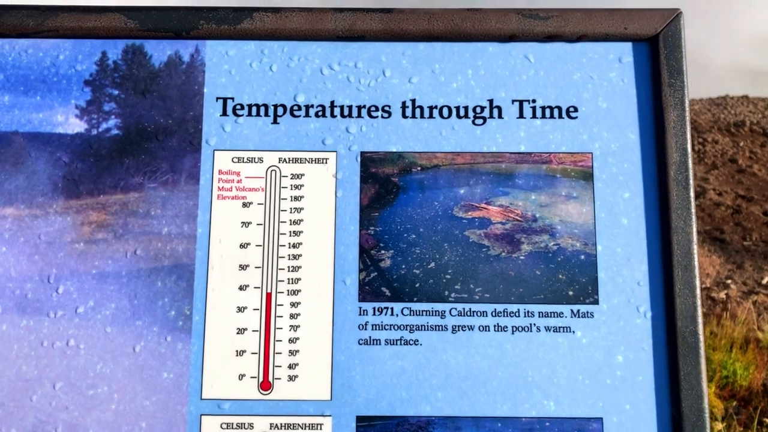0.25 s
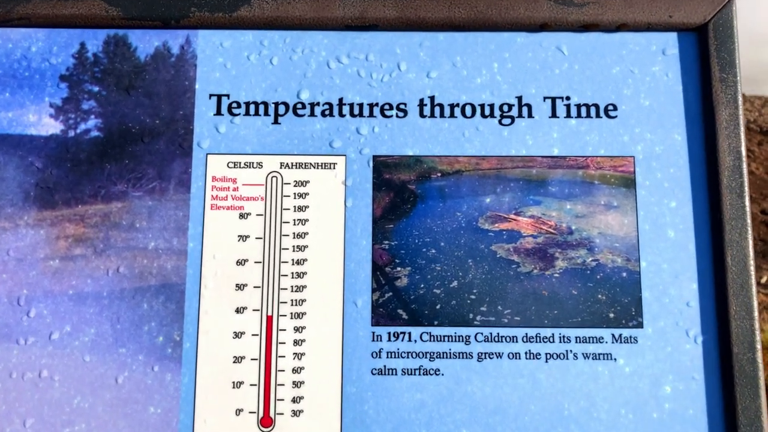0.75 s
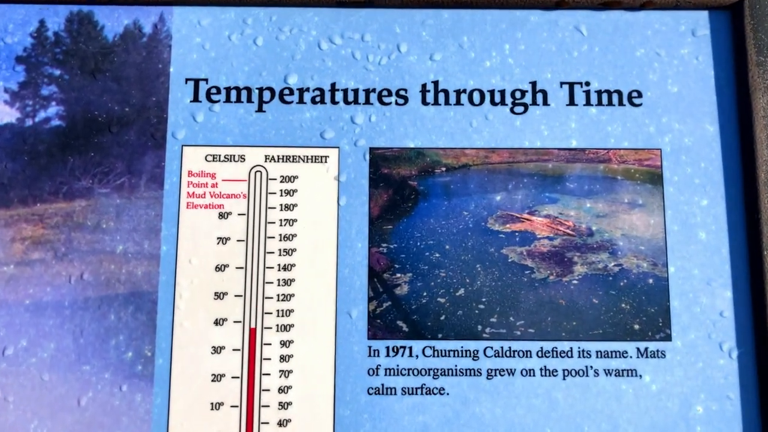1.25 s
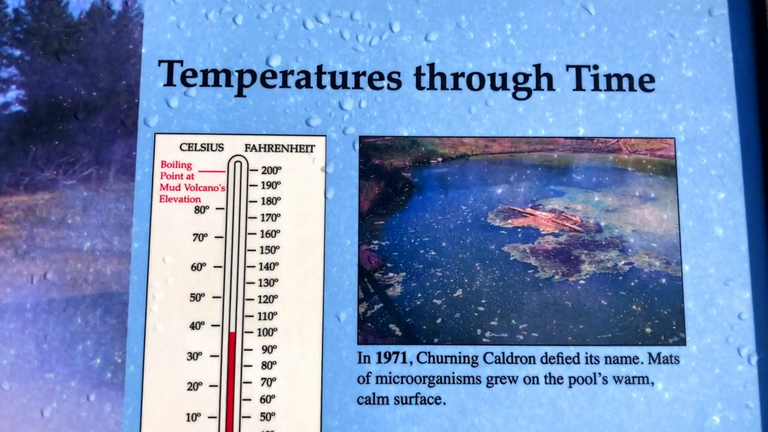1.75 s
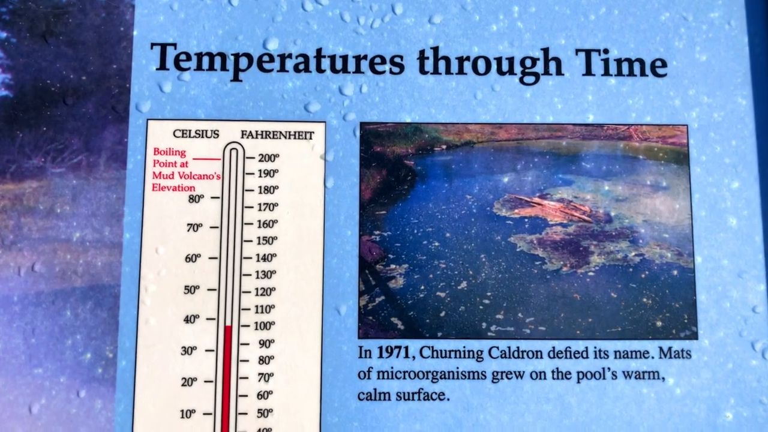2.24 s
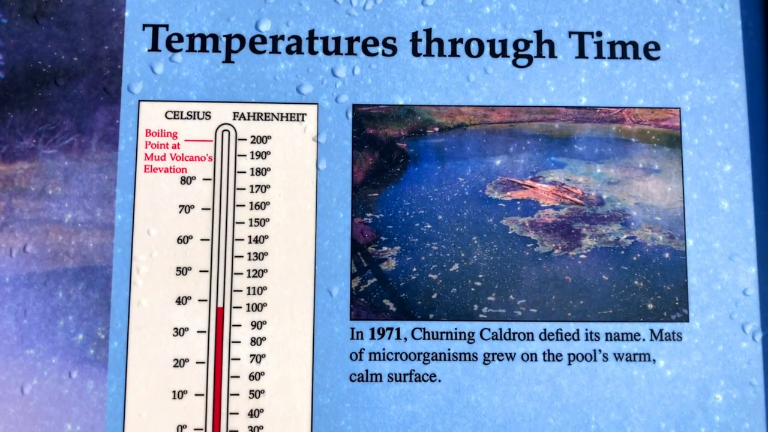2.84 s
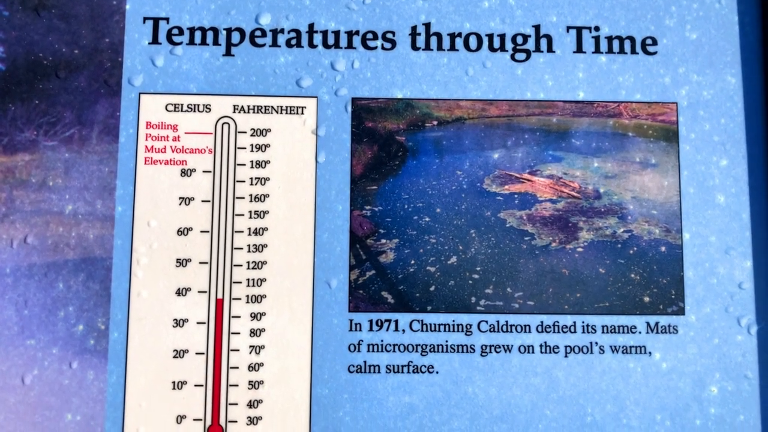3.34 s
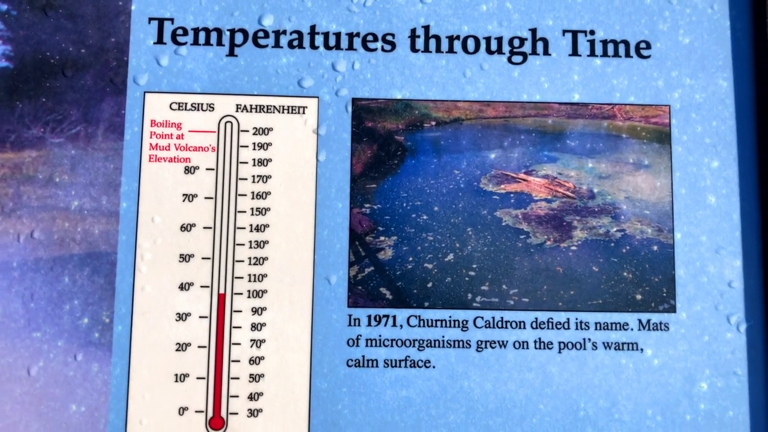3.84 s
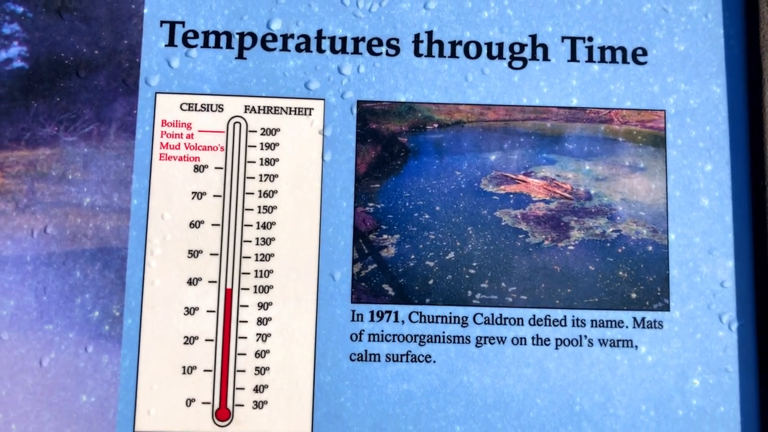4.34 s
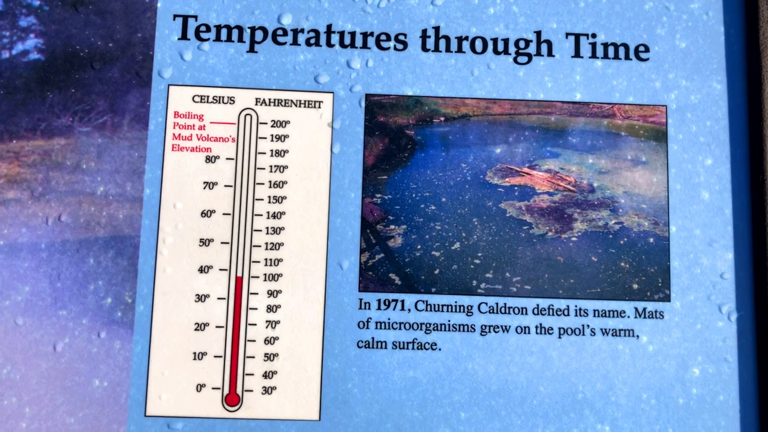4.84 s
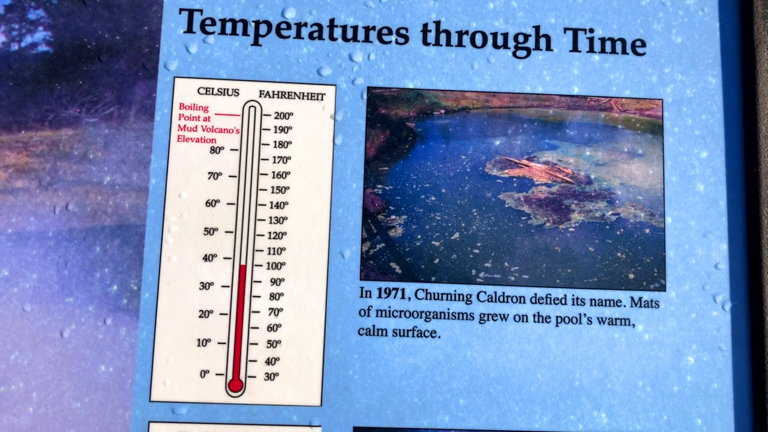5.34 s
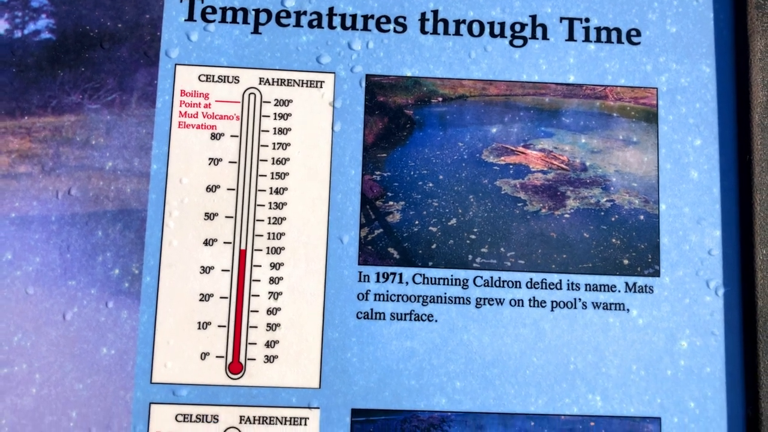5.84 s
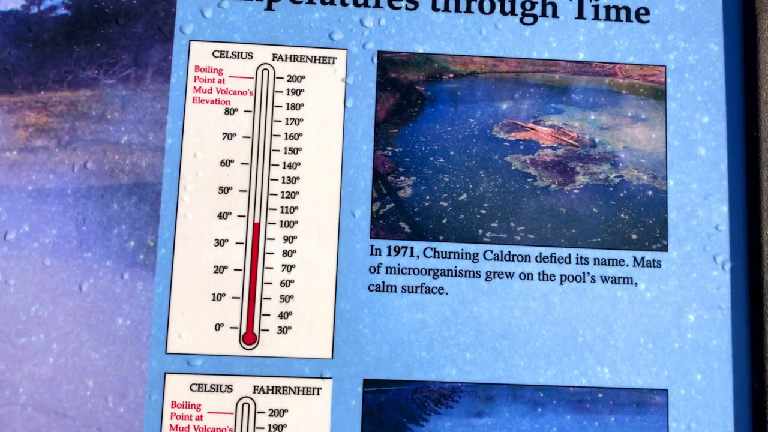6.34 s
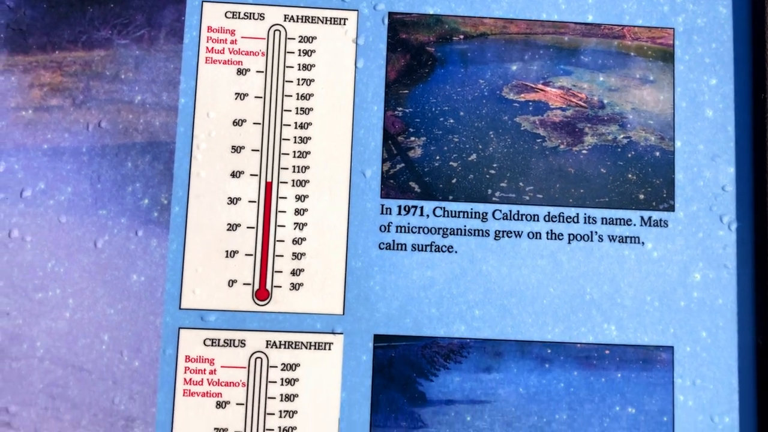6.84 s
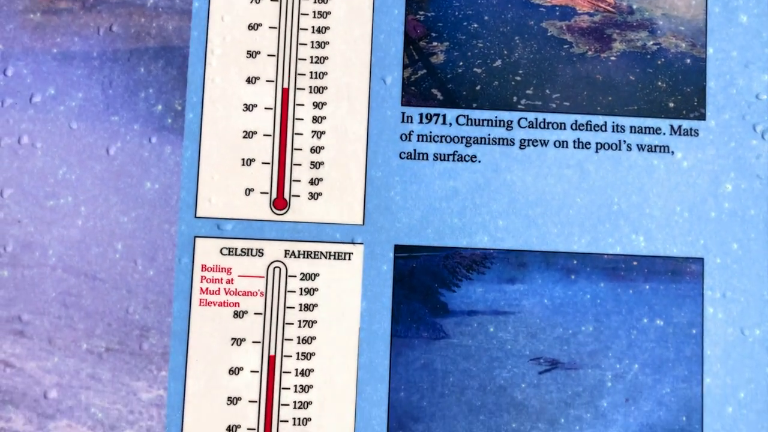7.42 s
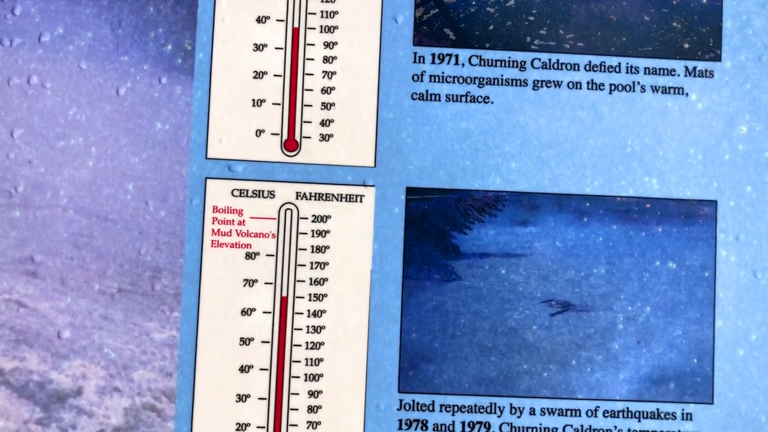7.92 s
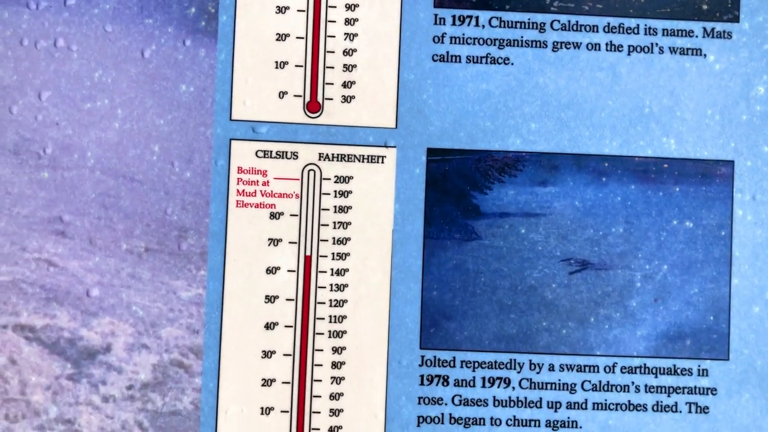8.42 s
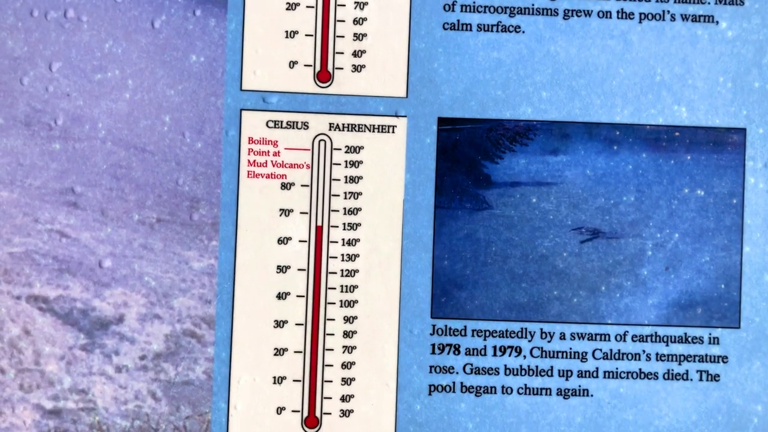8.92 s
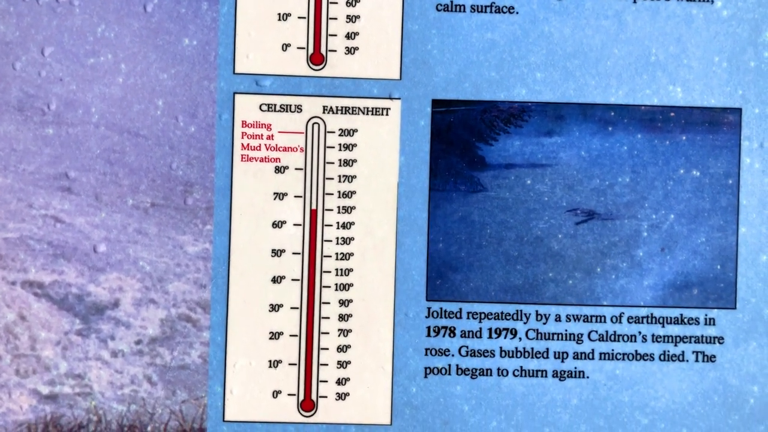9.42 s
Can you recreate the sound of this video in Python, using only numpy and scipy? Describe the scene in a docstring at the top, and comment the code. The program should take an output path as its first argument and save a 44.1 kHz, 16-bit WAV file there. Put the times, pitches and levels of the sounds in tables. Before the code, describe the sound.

Turbulent hot water gurgles, slaps and hisses continuously, swelling around the middle with heavy bubble thumps before a final sharp burst of steam.

```python
"""Churning, splashing water is heard first: a boiling hot spring from a few metres, bubbles thumping as they burst.
A hollow roar stands over it, spray hisses in gusts, and a rush of steam builds at the end.
Water, roar, spray and steam are coloured patchy noise, most with swarms of bubbles; big bubbles are gliding
damped sines. A two-port microphone takes it; its treble is one signal, shifted between the channels.
"""
import sys
import numpy as np
from scipy import signal
from scipy.fft import rfft, irfft, next_fast_len
from scipy.io import wavfile
from scipy.ndimage import uniform_filter1d, map_coordinates

SR = 44100
rng = np.random.default_rng(int(sys.argv[2]) if len(sys.argv) > 2 else 0)


def generate_wav(signal):
    """Clip the signal to [-1, 1] and save it as 16-bit WAV at the path in sys.argv[1]."""
    frames = np.transpose(np.atleast_2d(signal))
    scaled = np.clip(frames, -1, 1) * 32767
    pcm = np.round(scaled).astype(np.int16)
    wavfile.write(sys.argv[1], SR, pcm)


def how_loud(loudness_db):
    """Turn decibels into a plain amplitude multiplier (0 dB gives 1, 20 dB gives 10)."""
    steps = np.asarray(loudness_db, float) / 20
    return 10 ** steps


N = 426447  # samples


def unit(x):
    """Scales to rms 1."""
    return x / np.sqrt(np.mean(x ** 2) + 1e-20)


def along(points, hz):
    """Interpolates (frequency [Hz], value) points on a log frequency axis."""
    f, v = np.transpose(points)
    return np.interp(np.log(hz + 1), np.log(f + 1), v)


def curves(rows):
    """One value per sample for each column after the time."""
    s, *cols = np.transpose(rows)
    return [np.interp(np.arange(N) / SR, s, c) for c in cols]


def wobble(rate_hz):
    """Smooth random curve with rate_hz knots a second."""
    knots = rng.standard_normal(int(N * rate_hz / SR) + 4)
    return map_coordinates(knots, [np.arange(N) * rate_hz / SR])


def filtered(x, response):
    """Applies a complex response of frequency [Hz]."""
    m = next_fast_len(N + 8192)
    return irfft(rfft(x, m) * response(np.fft.rfftfreq(m, 1 / SR)), m)[..., :N]


def patchy(patch_db, streak_db=0.0):
    """Two noises sharing short patches of random gain and long narrow streaks."""
    z = signal.stft(rng.standard_normal((2, N)), nperseg=512)[2]
    chance = rng.standard_normal((2, *z.shape[1:]))
    # axis 0: frequency, axis 1: time
    patches = uniform_filter1d(uniform_filter1d(chance[0], size=5, axis=0), size=10, axis=1)
    streaks = uniform_filter1d(uniform_filter1d(chance[1], size=60, axis=1), size=30, axis=1)
    gain = how_loud(patch_db * unit(patches) + streak_db * np.tanh(unit(streaks)))
    return signal.istft(z * gain, nperseg=512)[1][:, :N]


# left-right likeness: (frequency [Hz], likeness [0-1])
LIKENESS = [(60, 0.98), (300, 1), (550, 0.78), (800, 0.73), (1300, 0.2), (2000, 0.06), (3000, 0), (5500, 0)]


def at_ports(pair, colour, lead_s, least_alike=0):
    """Colours a direct and a scattered signal and spreads them on two ports, rms 1; the left hears first."""
    def spread(hz):
        angle = np.arccos(np.clip(along(LIKENESS, hz), least_alike, 1)) / 2
        return how_loud(along(colour, hz)) * [np.cos(angle), np.sin(angle)]

    def lead(hz):
        return np.exp(1j * np.pi * hz * lead_s * np.array([[1], [-1]]))

    mid, side = filtered(pair, spread)
    return unit(filtered(np.array([mid + side, mid - side]), lead))


# creep of the colours: (time [s], shift of roar and low wash, shift of high wash)
# shifts: 0 lowered, 1 plain, 2 raised
COLOUR_SHIFT = [(0, 0.08, 0.96), (1.5, 0.15, 1), (2.1, 0.69, 0.53), (2.5, 1.2, 0.95), (4.2, 0.95, 1.1),
                (6, 0.95, 1.05), (7, 1.28, 0.36), (8.4, 1.2, 0.31), (8.8, 1.2, 1.36), (9.3, 1.7, 2),
                (9.67, 1.3, 1.4)]


def colour_shifts():
    """Creep of the two groups of colours over time."""
    return curves(COLOUR_SHIFT)


def drifting(pair, colour, lead_s, shift):
    """Slides a colour in frequency by cross-fading three fixed versions."""
    total = 0
    for k, ratio in enumerate((0.901, 1, 1.21)):  # frequency ratios: lowered, plain, raised
        share = np.clip(1 - np.abs(np.clip(shift, 0, 2) - k), 0, 1)
        total = total + share * at_ports(pair, np.multiply(colour, [ratio, 1]), lead_s)
    return total


def bubbles(start_s, hz, size, cycles, rise, span):
    """Damped sines with a soft start; over cycles of the start pitch the pitch gains rise times itself."""
    turns = hz[:, None] * np.arange(span) / SR
    phase = 2 * np.pi * (turns + rise * turns ** 2 / (2 * cycles))
    envelope = (1 - np.exp(-turns / 0.27)) * np.exp(-3 * turns / cycles)
    grain = size[:, None] * np.sin(phase) * envelope
    at = (start_s * SR).astype(int)[:, None] + np.arange(span)
    return np.bincount(at.ravel(), grain.ravel(), N + span)[:N]


def swarm(count, mid_hz, spread, cycles, scatter_db, span, rise=0.848):
    """Many bubbles at random moments, pitches and sizes, rms 1."""
    chance = rng.standard_normal((count, 2))
    hz = mid_hz * np.exp(spread * chance[:, 0])
    size = how_loud(scatter_db * np.clip(chance[:, 1], -2, 2))
    return unit(bubbles(rng.random(count) * N / SR, hz, size, cycles, rise, span))


def swells(crest_s, peak_db, rise_s, fall_s):
    """Power envelope of events that grow exponentially to a crest and die away."""
    knots = np.arange(0, N + 64, 64)
    late_s = knots / SR - np.asarray(crest_s)[:, None]
    decay = np.where(late_s < 0, -late_s / np.reshape(rise_s, (-1, 1)), late_s / fall_s)
    power = how_loud(peak_db) ** 2 @ np.exp(-decay) ** 2
    return np.interp(np.arange(N), knots, power)


def joined(db, power):
    """Gain of a base level with swells added in power."""
    return np.sqrt(how_loud(db) ** 2 + power)


# rush of steam: (time [s], level [dB])
STEAM_LEVEL = [(8.9, -60), (9.15, -56), (9.3, -51), (9.45, -41), (9.55, -39.5), (9.67, -33)]
# its colour: (frequency [Hz], relative density [dB per Hz])
STEAM_COLOUR = [(900, -30), (1800, 10), (2600, 4.5), (3500, -7), (4400, 4), (5300, -0.5), (7000, -2),
                (9000, -3), (12000, 0), (16000, -7), (20000, -40)]


def steam():
    """Smooth broad hiss from one vent, swelling fast."""
    level_db, = curves(STEAM_LEVEL)
    hiss = at_ports(patchy(1.7, streak_db=1.5), STEAM_COLOUR, lead_s=0.0001, least_alike=0.31)
    return how_loud(level_db + 0.82 * wobble(28)) * hiss


# puffs of spray: (crest time [s], peak level [dB], rise time constant [s])
PUFF_EVENTS = [(.21, -50, .1), (.9, -44, 0.12), (1.0, -41, 0.026), (2.2, -45, 0.56), (2.3, -52, .015),
               (2.83, -48, 0.18), (3.15, -41.5, 0.32), (3.58, -49, 0.045), (3.85, -48.5, 0.045),
               (4.36, -49.5, 0.18), (5.01, -48, 0.055), (6.45, -51, 0.66), (6.84, -50, 0.04),
               (8.83, -44.5, 0.079)]


def puffs():
    """Power of the puffs of spray."""
    return swells(*np.transpose(PUFF_EVENTS), fall_s=0.063)


# slaps of water on the rim:
# (crest time [s], wash peak level [dB], splash peak level [dB], rise time constant [s])
SLAP_EVENTS = [(.3, -46, -52, .04), (2.23, -44, -39, 0.083), (2.302, -48, -38.5, 0.013),
               (3.12, -37, -51, 0.075), (6.36, -37, -48, 0.039), (6.42, -43, -37.5, 0.06),
               (6.81, -47, -45, 0.045), (8.78, -36, -54, 0.08)]


def slaps():
    """Power of the slaps in the wash, and of the splash they throw up."""
    crest_s, wash_db, splash_db, rise_s = np.transpose(SLAP_EVENTS)
    return [swells(crest_s, db, rise_s, fall_s=0.025) for db in (wash_db, splash_db)]


# spray between puffs: (time [s], level [dB])
SPRAY_LEVEL = [(0, -45.5), (1.5, -49.5), (2.25, -44), (2.45, -53.5), (3.2, -49.5), (4.7, -53), (5.6, -51.5),
               (6.1, -49.5), (7.4, -46.5), (7.7, -52), (8.9, -50), (9.67, -36.5)]
# its colour: (frequency [Hz], relative density [dB per Hz])
SPRAY_COLOUR = [(800, -4.5), (2500, 6.5), (5000, -7), (8500, 3), (12000, 1.5), (16000, -8.5), (20000, -43)]


def spray(puff_power, flicker):
    """Hiss of noise and short droplet grains, gusting in puffs."""
    level_db, = curves(SPRAY_LEVEL)
    mist = unit(patchy(1.0, streak_db=3.0))
    mist[0] += 0.25 * swarm(count=6000, mid_hz=7050, spread=0.4, cycles=2.4, scatter_db=7.0, span=64)
    # one spot: both ports hear much the same hiss
    hiss = at_ports(mist, SPRAY_COLOUR, lead_s=0.00017, least_alike=0.95)
    return joined(level_db, puff_power) * how_loud(0.42 * flicker) * hiss


# splash colour: (frequency [Hz], relative density [dB per Hz])
SPLASH_COLOUR = [(900, -52), (1600, -6.5), (1900, -4.5), (2200, -7.5), (2500, -8), (2800, -10.5),
                 (3200, -11), (4000, -11.5), (6000, -20), (12000, -74)]


def splash(level_db, puff_power, thrown_power):
    """Splashing noise with long-ringing drops, lifted by puffs and slaps."""
    drops = unit(patchy(1.35, streak_db=3.2))
    drops[0] += 0.41 * swarm(count=2500, mid_hz=2806, spread=0.3, cycles=103, scatter_db=1.0,
                             span=1600, rise=0.026)
    uneven_db = level_db + 0.75 * wobble(12) + 0.65 * wobble(22)
    gain = joined(uneven_db, puff_power * how_loud(0.5) ** 2 + thrown_power)  # 0.5 dB over the puff
    return gain * at_ports(drops, SPLASH_COLOUR, lead_s=0.00018)


# wash colours: (frequency [Hz], relative density [dB per Hz])
LOW_WASH_COLOUR = [(500, -51), (800, -19), (870, -5.5), (980, -2.5), (1180, -2.5), (1340, -12.5),
                   (2000, -64)]
HIGH_WASH_COLOUR = [(900, -31), (1280, -2), (1450, 10), (1620, 3), (1800, -2.5), (2600, -25.5)]


def wash(low_db, high_db, slap_power, thrown_power, flicker):
    """Froth of noise and small bubbles in two bands whose colours creep."""
    low_shift, high_shift = colour_shifts()
    froth = unit(patchy(1.0, streak_db=3.0))
    froth[0] += 0.34 * swarm(count=4000, mid_hz=1251, spread=0.302, cycles=28, scatter_db=2.0,
                             span=1000, rise=0.03)
    low_gain = joined(low_db + 0.6 * wobble(8), slap_power)
    high_gain = joined(high_db + 0.73 * wobble(11), thrown_power * 0.38)
    low = low_gain * drifting(froth, LOW_WASH_COLOUR, 0.00022, low_shift)
    high = high_gain * drifting(froth, HIGH_WASH_COLOUR, 0.00015, high_shift)
    return (low + high) * how_loud(0.12 * flicker)


# surface water: (time [s], low wash level [dB], high wash level [dB], splash level [dB])
WATER_LEVELS = [(0.0, -46, -50, -45.5), (0.29, -37, -47, -44.5), (0.55, -39, -45, -45.5),
                (1.2, -39.5, -45.5, -44.5), (1.83, -41.5, -49, -42.5), (2.05, -44, -47, -41),
                (2.18, -45.5, -45, -38.5), (2.36, -44, -53, -40), (2.41, -46, -51, -45),
                (2.53, -43, -49, -44.5), (2.57, -46, -43, -42), (2.8, -46, -45.5, -41.5),
                (3.01, -45.5, -42.5, -42.5), (4.58, -45.5, -45.5, -45.5), (5.93, -45.5, -44, -42),
                (6.27, -42.5, -43, -41), (6.38, -35.5, -43, -43), (6.49, -34, -47, -39.5),
                (6.54, -39.5, -49, -41), (8.59, -38.5, -48, -44), (8.67, -35, -41, -41.5),
                (8.95, -37, -43.5, -42), (9.1, -38, -39.5, -42), (9.43, -37, -45.5, -46.5),
                (9.67, -33.5, -36.5, -46)]


def surface():
    """Wash, splash and spray, tied by shared puffs, slaps and flicker."""
    low_db, high_db, splash_db = curves(WATER_LEVELS)
    puff_power = puffs()
    slap_power, thrown_power = slaps()
    flicker = wobble(14) + 2.1 * wobble(35)  # wash and spray only
    water = wash(low_db, high_db, slap_power, thrown_power, flicker)
    return water + splash(splash_db, puff_power, thrown_power) + spray(puff_power, flicker)


# loss of the hollow ring: (time [s], power share of broad roar [0-1])
BROAD_SHARE = [(0, 0), (8.5, 0.15), (9.0, 0.5), (9.67, 1)]
# roar colours, hollow and broad: (frequency [Hz], relative density [dB per Hz])
HOLLOW_COLOUR = [(300, -38.5), (480, -8.5), (540, -7.5), (600, -1), (680, 0), (770, -5), (810, -14.5),
                 (1500, -61)]
BROAD_COLOUR = [(250, -33), (420, -3), (600, -1), (900, -5.5), (1100, -18.5), (2000, -50)]


def roar(level_db):
    """Hollow roar of the basin: narrow-band noise and bubbles, giving way to a broad band late on."""
    hollow = unit(patchy(0.33, streak_db=2.5))
    hollow[0] += 0.22 * swarm(count=2500, mid_hz=640, spread=0.244, cycles=14.2, scatter_db=2.0,
                              span=1200, rise=0.053)
    shift = np.minimum(colour_shifts()[0], 1)  # never above plain
    ring = drifting(hollow, HOLLOW_COLOUR, 0.00021, shift)
    broad = at_ports(patchy(0.7), BROAD_COLOUR, lead_s=0.00021)
    share = np.clip(curves(BROAD_SHARE)[0], 0, 1)
    blend = np.sqrt(1 - share) * ring + np.sqrt(share) * broad
    return how_loud(level_db + 0.37 * wobble(11) + 0.8 * wobble(4)) * blend


# deep thuds under the pool: (crest time [s], peak level [dB])
THUD_EVENTS = [(.08, -32), (1.355, -32), (1.52, -31), (2.05, -32), (2.63, -25), (2.69, -28), (3.2, -31),
               (3.61, -29), (4.66, -30), (4.9, -26.5), (5.06, -29), (5.38, -40), (5.62, -20), (5.72, -26),
               (6.03, -25), (6.54, -27), (6.33, -21), (6.72, -30), (6.86, -27), (8.64, -26), (9.03, -27.5),
               (9.43, -27), (9.62, -27)]
# rumble colour: (frequency [Hz], relative density [dB per Hz])
RUMBLE_COLOUR = [(15, -43), (28, -12), (48, 2.5), (70, 3.5), (95, 1.5), (200, -65)]


def rumble(churn_db):
    """Deep noise that follows the churn in random lumps, swelling into thuds."""
    under_churn_db, lumps_db = -15.5, 3.5
    base_db = churn_db + under_churn_db + lumps_db * wobble(9)
    thuds = swells(*np.transpose(THUD_EVENTS), rise_s=0.025, fall_s=0.082)
    return joined(base_db, thuds) * at_ports(patchy(0.76), RUMBLE_COLOUR, lead_s=0.00014)


# colours of churning water and its large bubbles: (frequency [Hz], relative density [dB per Hz])
CHURN_COLOUR = [(40, -58), (75, -8), (120, -1), (190, 3), (300, -1), (360, -3), (420, -7), (550, -16.5),
                (740, -22.5), (1000, -25), (3000, -51)]
GURGLE_COLOUR = [(30, -35), (60, -1), (350, -1), (600, -35), (3000, -70)]


def churn(level_db):
    """Churning water: low noise full of large bubbles with rising pitch."""
    big = [swarm(count=1500, mid_hz=171.9, spread=0.448, cycles=8.73, scatter_db=2.5, span=3000)
           for _ in range(2)]  # direct, scattered
    gurgle = at_ports(np.array(big), GURGLE_COLOUR, lead_s=0.00016)
    water = at_ports(patchy(0.62), CHURN_COLOUR, lead_s=0.00021) + how_loud(-5.5) * gurgle
    return how_loud(level_db + 0.72 * wobble(7) + 0.57 * wobble(3.5)) * unit(water)


# surging and slackening pool: (time [s], churn level [dB], hollow roar level [dB])
POOL_LEVELS = [(0, -26.5, -42), (.45, -27, -35.5), (.58, -30.5, -37.5), (1.36, -31.5, -36.5),
               (1.45, -28, -38.5), (2.05, -24.5, -34), (2.535, -29.5, -36.5), (2.552, -19, -32),
               (2.68, -24, -33), (3.15, -20.5, -31), (3.4, -24, -34), (3.6, -23, -31.5), (4.2, -24, -36.5),
               (4.45, -28, -33), (4.7, -24.5, -36), (4.9, -29, -36.5), (5.06, -24, -36), (5.2, -25, -31.5),
               (5.38, -22.5, -36), (5.52, -31, -33.5), (5.61, -24.5, -35), (5.72, -24, -39),
               (5.8, -22.5, -30), (6.24, -19, -30), (6.34, -18, -26.5), (6.48, -20.5, -26),
               (6.57, -20.5, -31.5), (6.85, -19, -28.5), (7.05, -22.5, -28.5), (7.2, -21, -30),
               (7.45, -20.5, -28), (7.66, -27, -33.5), (8.0, -22, -31.5), (8.4, -24, -31.5),
               (8.57, -25.5, -33), (8.8, -25.5, -29), (9.2, -28, -33), (9.27, -27, -35), (9.31, -21.5, -29),
               (9.45, -30, -35), (9.67, -25.5, -30.5)]


def pool():
    """Roar, rumble and churn; the rumble follows the churn level."""
    churn_db, roar_db = curves(POOL_LEVELS)
    return roar(roar_db) + rumble(churn_db) + churn(churn_db)


# big bubbles bursting: (start time [s], size before decay [dB], start pitch [Hz],
# life [cycles of start pitch], pitch gained over the life [multiple of start pitch])
BIG_BUBBLES = [(1.414, -21, 46.7, 8.1, 2.5), (1.491, -18, 68, 8.2, 1.5), (2.619, -21, 59.2, 7, 4.4),
               (5.593, -13.5, 57.5, 11.8, 4.4), (5.665, -14, 118.6, 11.3, 0.6), (6.03, -12, 115, 4.6, 0.8),
               (6.321, -6.5, 69.8, 5.3, 4.4), (6.44, -15, 175, 9, 0.5), (6.72, -12, 75, 6.1, 2),
               (6.85, -12.5, 110.5, 8, 1.5), (9.226, -6.5, 94, 3.5, -0.6), (9.29, -15.5, 232, 12, 0.3),
               (9.6, -19, 122, 12, 0.5)]


def heaves():
    """Big bubbles thump and glide, mostly upward, as they open, roughened by the turbulence around them."""
    start_s, size_db, hz, life, climb = np.transpose(BIG_BUBBLES)
    thumps = bubbles(start_s, hz, how_loud(size_db), cycles=life[:, None], rise=climb[:, None], span=SR // 2)
    return thumps * how_loud(1.9 * wobble(45))


def scene():
    """The spring as it reaches the two ports."""
    return steam() + surface() + pool() + heaves()


def roll_off(x):
    """The treble ends steeply here."""
    return signal.sosfilt(signal.butter(12, 17060, fs=SR, output="sos"), x)


# left over right: (frequency [Hz], level difference [dB])
PORT_LEAN = [(60, -1.5), (150, -2), (380, -0.6), (900, 0.5), (2500, 2.5), (5000, -1.4)]


def record(dry):
    """Two-port pickup: own sound below the crossover; above it the left port feeds both, shifted in phase."""
    crossover_hz, top_hz = 6300, 15760
    in_phase_hz, full_turn_hz = 7050, 4330  # channels in phase at the first, and every full turn from it
    sign = np.array([[-1], [1]])  # left, right

    def shared_power(hz):
        return 0.985 / (1 + (crossover_hz / (hz + 1)) ** 14)

    def own_response(hz):
        lean = how_loud(-sign * along(PORT_LEAN, hz) / 2)
        return np.sqrt(np.abs(1 - shared_power(hz))) * lean * (hz < top_hz)

    def shared_response(hz):
        shift = np.exp(1j * np.pi * sign * (hz - in_phase_hz) / full_turn_hz)
        return np.sqrt(shared_power(hz)) * shift * (hz < top_hz)

    mix = filtered(dry, own_response) + filtered(dry[0], shared_response)
    return roll_off(mix)


dry = scene()
out = record(dry)
generate_wav(out)
```